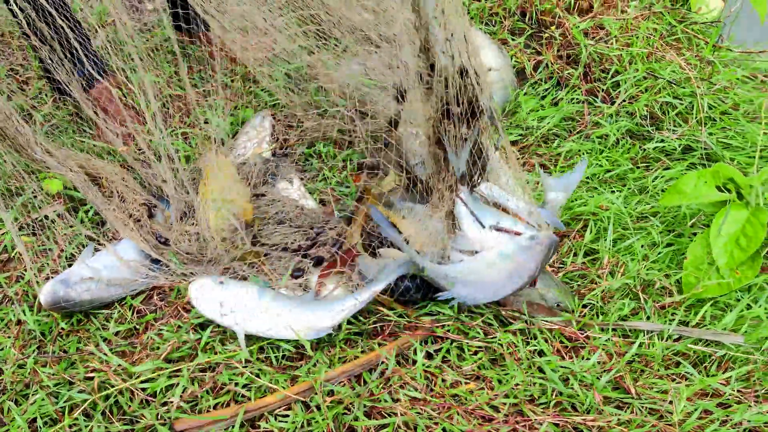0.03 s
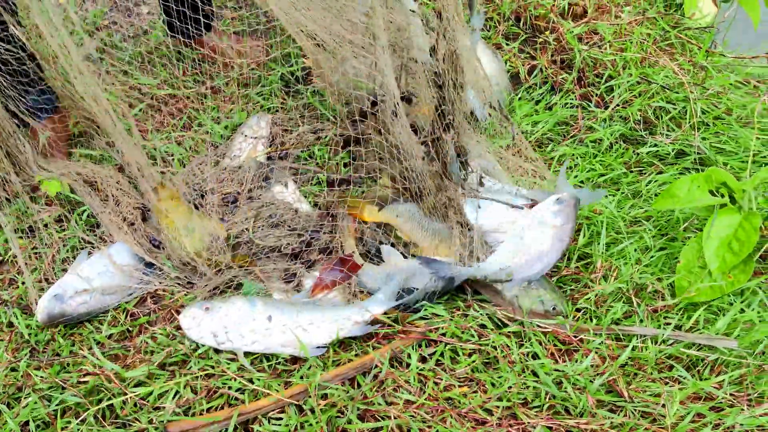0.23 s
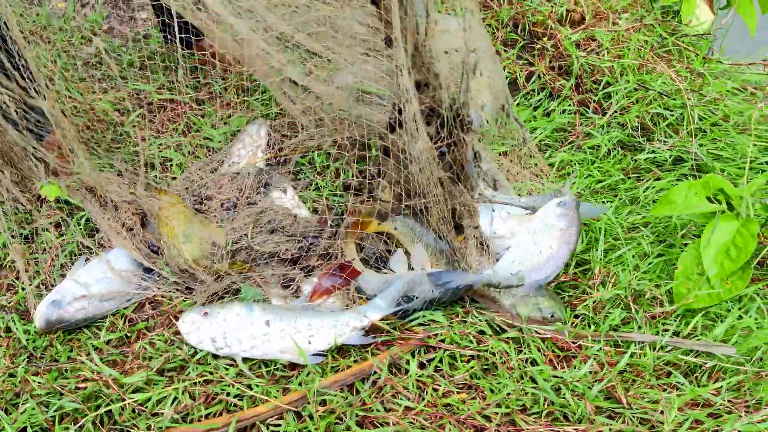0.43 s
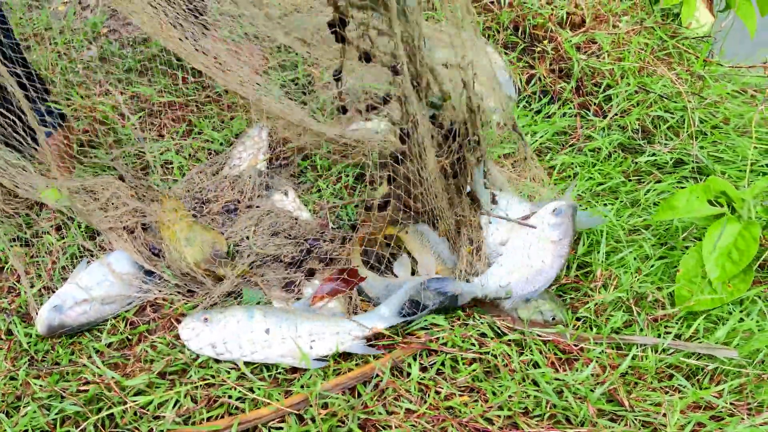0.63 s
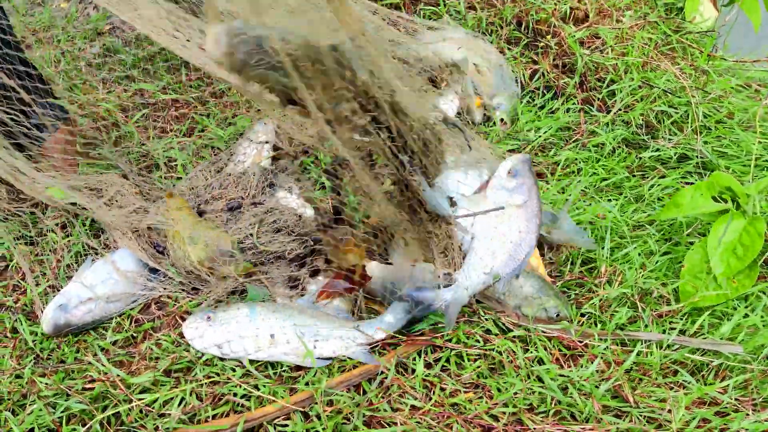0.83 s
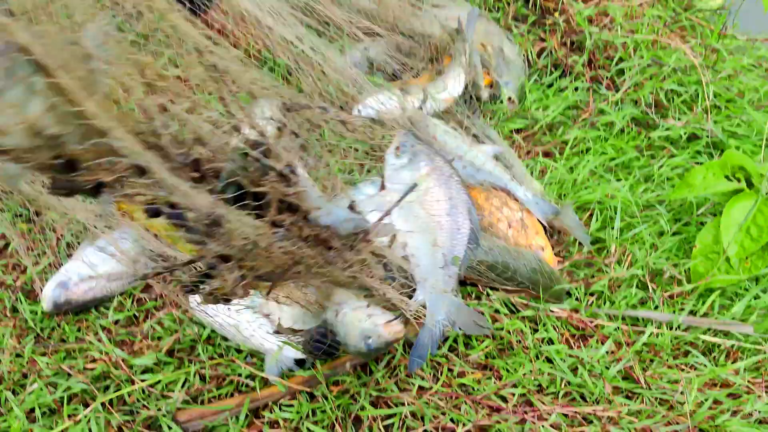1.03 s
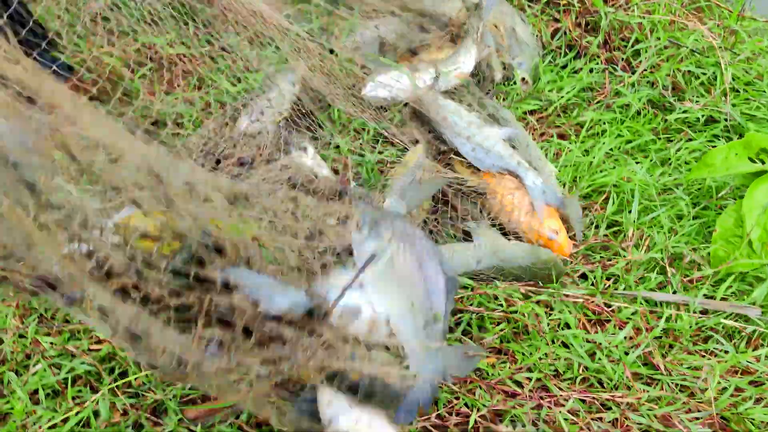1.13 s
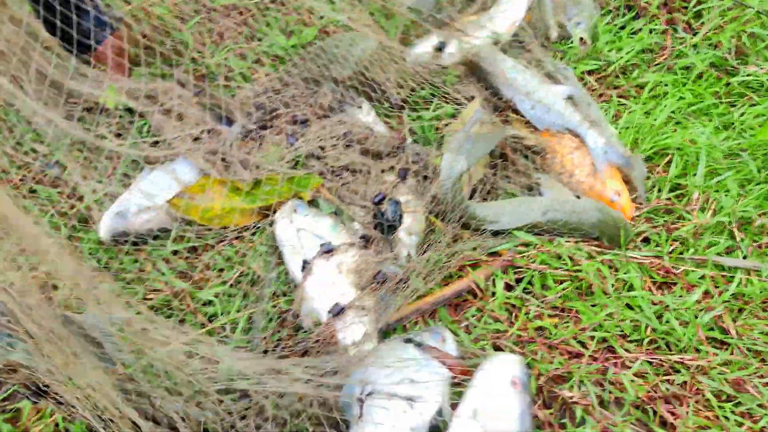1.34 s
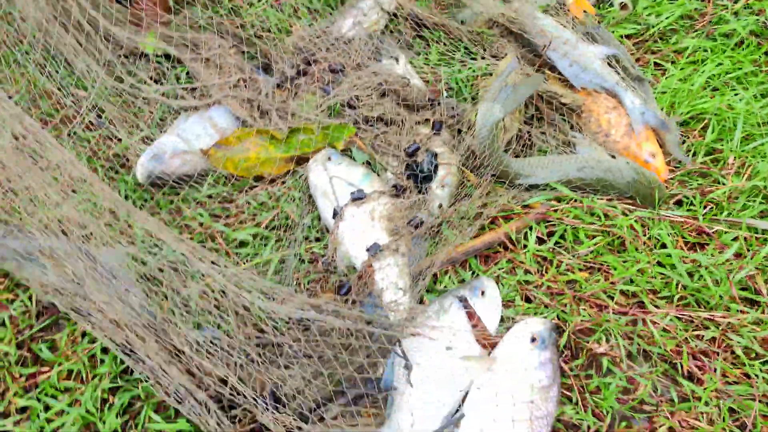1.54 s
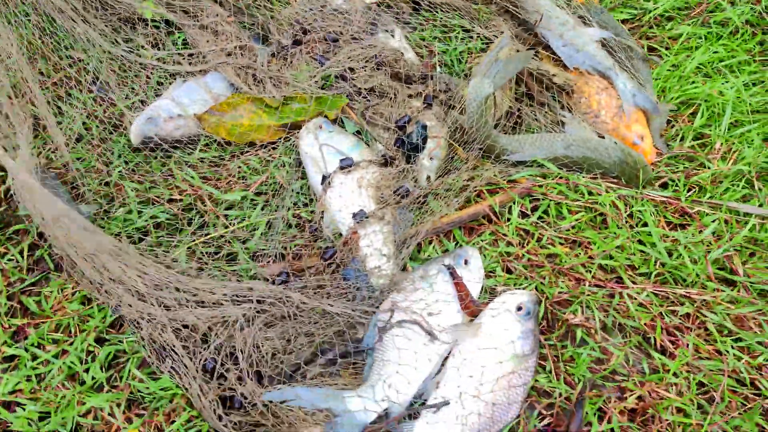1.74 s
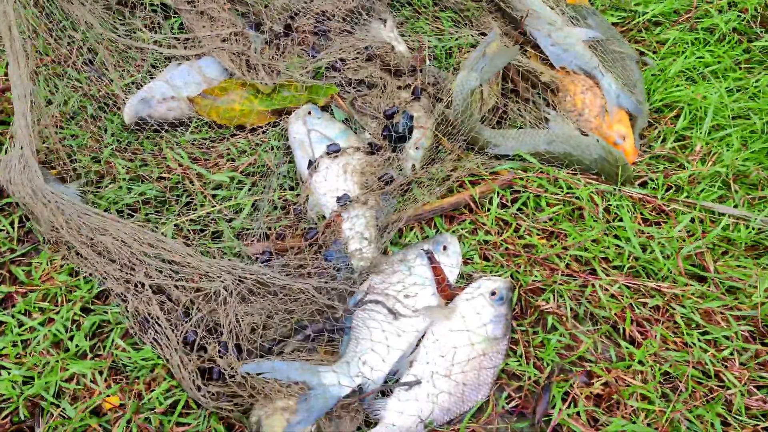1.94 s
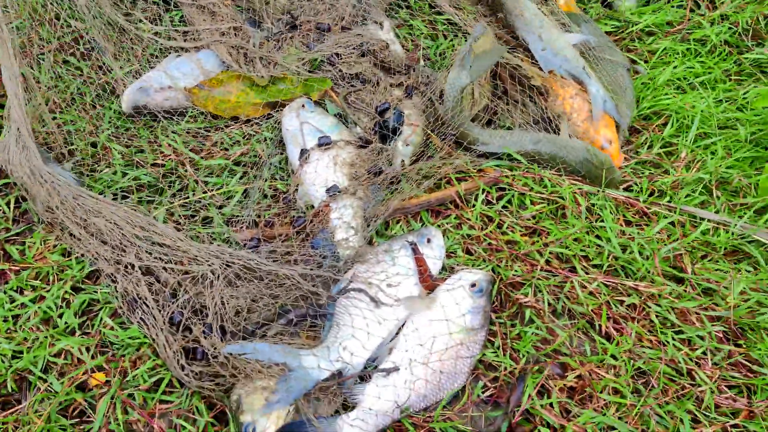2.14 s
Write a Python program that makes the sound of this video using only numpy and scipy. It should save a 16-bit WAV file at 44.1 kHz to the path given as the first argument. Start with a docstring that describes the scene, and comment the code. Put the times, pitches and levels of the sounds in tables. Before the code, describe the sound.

Fish flopping in a wet net on grass, with wet ticks, rustling mesh and wind thumps

```python
"""A fish flops in a wet net on grass beside a pond, close to a phone held in a breeze.
Knocks and short pitched ticks of the wet body and net are damped modes; brighter wet ticks are
resonant noise bursts; the net rustles as shot noise. Wind turbulence thumps at each of two
microphone ports on its own, with sharp pops at the left one, over a steady outdoor hiss of
coloured noise. Gain control, a faint early twin and a band limit shape the whole."""
import sys
import numpy as np
from scipy import signal
from scipy.fft import rfft, irfft
from scipy.io import wavfile
from scipy.ndimage import uniform_filter1d, map_coordinates

SR = 44100
rng = np.random.default_rng(int(sys.argv[2]) if len(sys.argv) > 2 else 0)


def materialize(psi):
    """Save the field psi as 16-bit PCM at rate SR to the path in sys.argv[1].

    A 1-D psi becomes a single channel; in a 2-D psi each row is a channel.
    """
    bounded = np.clip(np.atleast_2d(psi).T, -1, 1)
    quanta = np.round(bounded * 32767).astype(np.int16)
    wavfile.write(sys.argv[1], SR, quanta)


N = 96446


def amp(db):
    """Level law: 20 dB is a factor of ten in pressure."""
    return 10 ** (np.asarray(db) / 20)


def evened(x):
    """Normalisation to unit root-mean-square pressure."""
    return x / np.sqrt(np.mean(x ** 2) + 1e-20)


def read(points, hz):
    """Interpolation of a spectrum along logarithmic frequency."""
    f, value = np.transpose(points)
    return np.interp(np.log(hz + 0.00075), np.log(f + 0.0013), value)


def curves(table):
    """Linear interpolation in time of each column after the first."""
    t, *columns = np.transpose(table)
    return [np.interp(np.arange(N) / SR, t, column) for column in columns]


def colour(x, points, samples_per_unit=SR):
    """Linear filtering: the spectrum is multiplied by a gain curve."""
    f = np.fft.rfftfreq(x.shape[-1], 1 / samples_per_unit)
    return irfft(rfft(x) * amp(read(points, f)), x.shape[-1])


PORT_LEAD_S = .0004


def ports(left, right, pan_db):
    """Stereo cues: a level difference, and a travel delay that lets the left port hear first."""
    late_right = np.roll(right, round(PORT_LEAD_S * SR))
    return np.array([left * amp(pan_db / 2), late_right * amp(-pan_db / 2)])


def add(mix, s, sound):
    """Superposition of a sound starting at time s, cut off at the end of the mix."""
    part = mix[..., round(s * SR):][..., :sound.shape[-1]]
    part += sound[..., :part.shape[-1]]


# Gusts at each port: t/s, nominal level/dB, eddy rate f/Hz
GUSTS_LEFT = [(0.0, -34, 86), (0.065, -31.5, 90.9), (0.185, -45, 75.43), (0.314, -30, 60.72),
              (0.464, -40.5, 75.4), (0.499, -33.5, 81.83), (0.723, -34.5, 70.24), (0.828, -49, 76),
              (0.858, -31, 58.7), (0.883, -56, 199.7), (.903, -31, 288), (0.923, -16.5, 224.8),
              (0.953, -12.5, 229.5), (1.003, -15.5, 107.8), (1.028, -26.5, 109.5), (1.068, -15, 88.7),
              (1.107, -19, 105.6), (1.152, -18, 69.16), (1.307, -19, 94.5), (1.352, -18.5, 97.4),
              (1.387, -16, 87.3), (1.437, -40, 67.2), (1.537, -24, 90.86), (1.576, -47, 75.05),
              (1.751, -27.5, 67.15), (1.786, -38, 72.66), (1.826, -16.5, 63.77), (1.961, -32, 77.42),
              (2.03, -23, 91.17), (2.13, -41, 91.47), (2.185, -29, 60.06)]
GUSTS_RIGHT = [(0.0, -54, 76.1), (0.135, -44.5, 74.56), (0.274, -35, 70.84), (0.314, -38.5, 73.3),
               (0.429, -47, 74.9), (0.474, -42, 75.8), (0.688, -43.5, 75.1), (0.868, -42.5, 74.87),
               (1.018, -44, 74), (1.058, -26, 84.5), (1.112, -27.5, 76.46), (1.157, -35, 71.1),
               (1.217, -20, 106.4), (1.262, -23, 63.65), (1.342, -40, 74.5), (1.387, -25.5, 56),
               (1.462, -32, 69.45), (1.487, -31, 67.37), (1.517, -32, 102.9), (1.566, -20, 86.3),
               (1.616, -39, 96.4), (1.646, -26.5, 82.24), (1.681, -37, 81.4), (1.716, -25, 120.4),
               (1.771, -12, 89.83), (1.811, -29, 65.34), (1.851, -20.5, 90.2), (1.961, -30, 91.14),
               (2.085, -22.5, 71.4), (2.185, -37, 79.37)]
# Turbulence spectrum: f/eddy rate, relative level/dB
EDDY_SPECTRUM = [(.1, 18), (.5, 1.5), (.8, -0.5), (1.3, -7.5), (2, -12.5), (3, -24.5), (4.5, -35.5),
                 (8, -51), (20, -111)]
LUMPS_DB, WIND_CUT_HZ = 2.58, 35.3  # rms level fluctuation; high-pass cutoff


def wind(gusts):
    """Frozen turbulence: a fixed pattern of eddies is carried past the port at the speed of the gust."""
    level_db, eddy_hz = curves(gusts)
    per_eddy = 64  # pattern samples per eddy
    pattern = evened(colour(rng.standard_normal(400 * per_eddy), EDDY_SPECTRUM, per_eddy))
    lumps = uniform_filter1d(rng.standard_normal(N), 500)
    lumps = evened(uniform_filter1d(lumps, 500))
    position = np.cumsum(eddy_hz) / SR * per_eddy
    x = map_coordinates(pattern, [position], order=3, mode="wrap")
    x = signal.lfilter(*signal.butter(2, WIND_CUT_HZ, "high", fs=SR), x)
    # even out the running power, so that the table governs the level
    x = x / np.sqrt(uniform_filter1d(x ** 2, 1700) + 0.015)
    return x * amp(level_db + LUMPS_DB * lumps)


# Hiss spectrum: f/Hz, relative level/dB per Hz
AIR_SPECTRUM = [(170, -6), (300, -9.5), (480, -16.5), (630, -11), (1000, -13), (1760, -15.5), (2260, -13.5),
                (4390, -16), (6100, -18), (7000, -18), (7400, -28.5), (9000, -29), (15000, -51.5),
                (15700, -63)]
# Coherence of the ports: f/Hz, left-right likeness
AIR_LIKENESS = [(100, 0.33), (400, 1), (1000, 0.057), (2500, 0.14), (6000, 0.24), (15000, 0.064)]
# Balance of the ports: f/Hz, left-right level/dB
AIR_PAN = [(60, 12), (180, -1.5), (550, 1.5), (1650, -4), (4970, -5), (15000, 8.5)]
AIR_DB, PATCHES_DB = -46.5, 1.78  # rms hiss level; rms patchiness


def air():
    """Diffuse noise field: steady, gently patchy hiss with partial coherence between the ports."""
    frames, hz = N // 256 + 5, np.fft.rfftfreq(1024, 1 / SR)
    a, b, c, d, patches = rng.standard_normal((frames, 513, 5)).T
    patches = uniform_filter1d(patches, 12, 0)  # along frequency
    patches = evened(uniform_filter1d(patches, 12, 1))  # along time
    same = np.clip(read(AIR_LIKENESS, hz), -1, 1)[:, None]
    pan_db = read(AIR_PAN, hz)[:, None]
    left = a + 1j * b
    right = same * left + np.sqrt(1 - same ** 2) * (c + 1j * d)
    z = np.array([left * amp(pan_db / 2), right * amp(-pan_db / 2)])
    z = z * amp(read(AIR_SPECTRUM, hz)[:, None] + PATCHES_DB * patches)
    x = signal.istft(z, nperseg=1024, noverlap=768)[1][:, :N]
    return amp(AIR_DB) * ports(*evened(x), 0)


# Dragged net: t/s, body level/dB, left-right level/dB, upper treble level/dB
NET_DRAG = [(0, -58, -6, -69), (.23, -52.5, -3, -66.5), (.32, -51, 0, -64), (.37, -57, -4, -74),
            (.42, -52, -1, -61.5), (.62, -57, -6.5, -72), (.69, -51, 3, -50), (.78, -50.5, -4, -65),
            (.86, -48.5, 1, -66), (.99, -56.5, -12, -72), (1.05, -45, 5, -55), (1.11, -50, -3, -63),
            (1.22, -55.5, -18.5, -75), (1.3, -50, 1, -54), (1.34, -39, -2, -54), (1.41, -43.5, -2, -54),
            (1.47, -46.5, -2.5, -58.5), (1.56, -49.5, -5.5, -69), (1.67, -50, -3, -63),
            (1.75, -59, -16, -75), (1.82, -51, 3, -59.5), (1.94, -46.5, -2, -54), (2.01, -44, 1, -54),
            (2.06, -49.5, -4, -62.5), (2.19, -54.5, -6, -73)]
# Spectrum of the rustle's body: f/Hz, relative level/dB
NET_BODY_SPECTRUM = [(1000, -26.5), (2000, -55), (3000, -14), (5000, -6.5), (5700, -1.5), (6200, 1),
                     (6900, -8), (7300, -47)]
# Spectrum of its upper treble: f/Hz, relative level/dB
NET_TREBLE_SPECTRUM = [(6500, -58), (7500, -3.5), (9000, -5), (12000, -1.5), (15200, -1), (15800, -16)]
CRACKLE_DECAY_S, CRACKLES_PER_S = 0.0072, 2200  # pressure time constant; mean rate
CRACKLE_SPREAD_DB, RUSTLE_LIKENESS = 4, 0.082  # exponential size scale; port correlation


def rustle():
    """Shot noise: dense random crackles of mesh on grass, each a short decaying puff of noise."""
    level_db, pan_db, treble_db = curves(NET_DRAG)
    struck = rng.random(N) < CRACKLES_PER_S / SR
    size_db = CRACKLE_SPREAD_DB * rng.exponential(1, N).clip(0, 4)
    energy = struck * amp(2 * size_db)
    power = signal.lfilter([1], [1, -np.exp(-2 / (CRACKLE_DECAY_S * SR))], energy)
    left, other = rng.standard_normal((N, 2)).T * np.sqrt(power)
    right = RUSTLE_LIKENESS * left + np.sqrt(1 - RUSTLE_LIKENESS ** 2) * other
    z = np.array([left, right])
    body = amp(level_db) * evened(colour(z, NET_BODY_SPECTRUM))
    treble = amp(treble_db) * evened(colour(z, NET_TREBLE_SPECTRUM))
    return ports(*(body + treble), pan_db)


# Knocks and short pitched ticks of the wet body and net:
# t/s, peak level/dB before panning, left-right level/dB, f/Hz, low mode gain/dB
KNOCKS = [(.451, -25, -5.5, 2180, 0), (.5035, -41, -6, 2740, -8), (.6645, -40, -2, 2250, -12),
          (.771, -37, 4, 2050, -12), (1.749, -39, -10, 3500, -14)]
# Modes of each knock or pitched tick: f/its pitch, relative level/dB, 60 dB decay time/s
KNOCK_MODES = [(0.33, -8, 0.012), (.45, -8, 0.016), (1, -3.5, 0.014), (1.09, -13, .012)]
KNOCK_RISE_S = .0015


def knocks():
    """Modal synthesis: a soft onset and a few heavily damped modes make each knock or pitched tick."""
    out, t = np.zeros((2, N)), np.arange(2048) / SR
    soft_onset = (1 - np.exp(-t / KNOCK_RISE_S)) ** 2
    phases = rng.random((len(KNOCKS), len(KNOCK_MODES)))
    for (s, db, pan_db, hz, low_db), turns in zip(KNOCKS, phases):
        x = np.zeros(len(t))
        for (ratio, mode_db, t60), turn in zip(KNOCK_MODES, turns):
            # the low mode gain acts only on modes below the pitch
            decay = amp(mode_db + low_db * (ratio < 1) - 60 * t / t60)
            x += decay * np.sin(2 * np.pi * (ratio * hz * t + turn))
        x *= soft_onset
        add(out, s, amp(db) / abs(x).max() * ports(x, x, pan_db))
    return out


# Wet ticks of net and scales: t/s, nominal level/dB, left-right level/dB, ring f/Hz,
# decay time constant/s, ring level/dB and body level/dB (both relative to the bright noise)
NET_TICKS = [(.6648, -23.5, -1, 6600, .004, -3, -4), (.7712, -26.5, 3, 6300, .0025, 8, 7),
             (.7945, -32, 2, 4200, .003, 14, 0), (.8503, -25, 2, 6550, .002, 16, 4),
             (1.0385, -33, 8, 6210, .002, 8, 0), (1.0612, -15.5, 9, 3700, .0016, 10, 16),
             (1.3411, -12.5, 4, 5950, .0025, 3, -12), (1.3606, -14, 1, 6050, .0025, 7, -12),
             (1.3688, -20, 0, 5975, .003, 9, -15), (1.3745, -27, -1, 5950, .002, -4, -15),
             (1.3967, -18.5, 2, 6000, .003, 10, -4), (1.4075, -26, -2, 6100, .003, 8, -15),
             (1.5432, -33, -5, 4954, .003, 6, 0), (1.9069, -25, -3, 6340, .002, -8, -8),
             (1.9236, -31, -2, 6120, .002, -8, -10)]
# Spectrum of the bright noise: f/Hz, relative level/dB
TICK_SPECTRUM = [(500, -16), (1500, -22), (3000, -70), (5000, -20), (6500, -7), (7500, -9), (11000, -8),
                 (14500, -12), (16000, -26)]
# Spectrum of the tick's body: f/Hz, relative level/dB
TICK_BODY_SPECTRUM = [(300, -20), (600, -2), (1500, -3), (3500, 0), (6000, -2), (7500, -25)]
TICK_RISE_S, RING_WIDTH_HZ = .0003, 900  # rise time constant; bandwidth of one resonator pass


def ticks():
    """Resonant filtering: bright noise decays in milliseconds, coloured by a ring at its own pitch."""
    out, t = np.zeros((2, N)), np.arange(2048) / SR
    noises = rng.standard_normal((len(NET_TICKS), 3, 2048))
    for (s, db, pan_db, hz, decay_s, ring_db, body_db), noise in zip(NET_TICKS, noises):
        shape = (1 - np.exp(-t / TICK_RISE_S)) * np.exp(-t / decay_s)
        z = noise[0] + .5 * noise[1:]  # shared noise plus a part of each port's own
        resonator = signal.iirpeak(hz, hz / RING_WIDTH_HZ, SR)
        ring = signal.lfilter(*resonator, signal.lfilter(*resonator, z))
        x = evened(colour(z, TICK_SPECTRUM)) + amp(ring_db) * evened(ring)
        x = x + amp(body_db) * evened(colour(z, TICK_BODY_SPECTRUM))
        x = evened(x) * shape
        add(out, s, amp(db) / 2 * ports(*x, np.clip(pan_db, -14, 14)))
    return out


# Sharp wind pops at the left port, most in its strongest gust, two later:
# t/s of centre, nominal level/dB, swing f/Hz
WIND_POPS = [(0.92, -13.5, 242), (.938, -9, 180), (0.9466, -4.5, 432), (0.953, -13.5, 272),
             (0.966, -7.5, 136), (0.973, -26, 185), (0.99, -19, 157), (1.0056, -14.5, 214),
             (1.292, -14.5, 179), (1.3098, -12, 91)]


def pops():
    """Pressure transient: each pop is one quick swing of pressure up and then down."""
    out, t = np.zeros(N), np.arange(-1000, 1000) / SR
    for s, db, hz in WIND_POPS:
        u = 2 * np.pi * hz * t
        add(out, s - 1000 / SR, -amp(db) * 2 * u / (1 + u ** 2 / 3) ** 2)
    return out


def scene():
    """Superposition of wind at the two ports and the sounds that reach both."""
    gusts = np.array([wind(GUSTS_LEFT) + pops(), wind(GUSTS_RIGHT)])
    return gusts + air() + rustle() + knocks() + ticks()


TWIN_LEAD_S, TWIN_DB = 768 / 44100, -9.5


def doubled(x):
    """Comb filtering: every sound has a fainter twin just ahead of it."""
    return x + amp(TWIN_DB) * np.roll(x, -round(TWIN_LEAD_S * SR), -1)


DUCK_FROM_DB, DUCK_SHARE = -19, 0.28  # threshold; dB of cut per dB above it
HELD_LEVEL_FALL_DB_PER_S, EDGE_HZ = 45, 16300  # detector release; low-pass cutoff


def record(dry):
    """Dynamic compression ducks both ports at high level; then come the twin and the band limit."""
    power = uniform_filter1d((dry ** 2).max(0), 900)  # the stronger port governs
    power_db = 10 * np.log10(abs(power) + 1e-12)
    fall = np.arange(N) * HELD_LEVEL_FALL_DB_PER_S / SR
    held_db = np.maximum.accumulate(power_db + fall) - fall
    over_db = np.maximum(held_db - DUCK_FROM_DB, 0)
    ducked = dry / amp(DUCK_SHARE * uniform_filter1d(over_db, 300))
    low_pass = signal.firwin(511, EDGE_HZ, window=("kaiser", 9), fs=SR)
    return signal.oaconvolve(doubled(ducked), low_pass[None], "same")


dry = scene()
out = record(dry)
materialize(out)
```